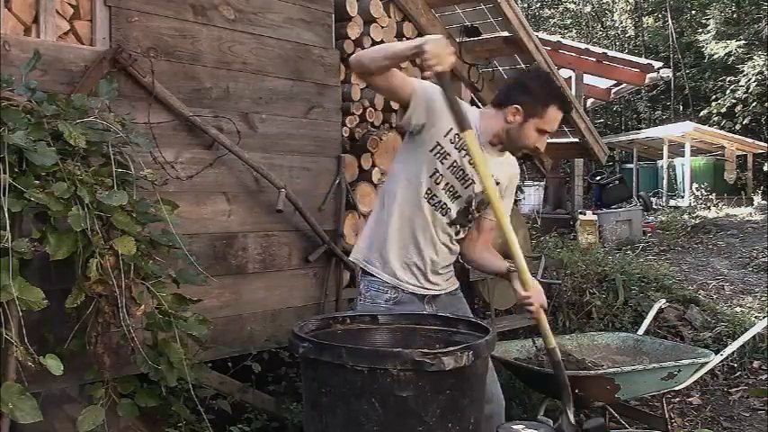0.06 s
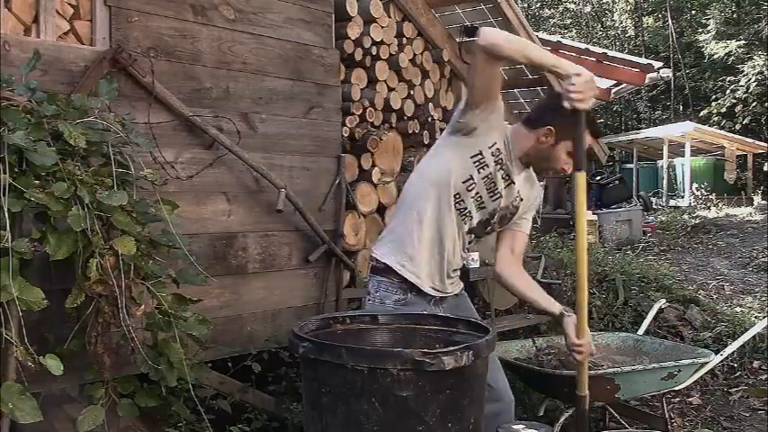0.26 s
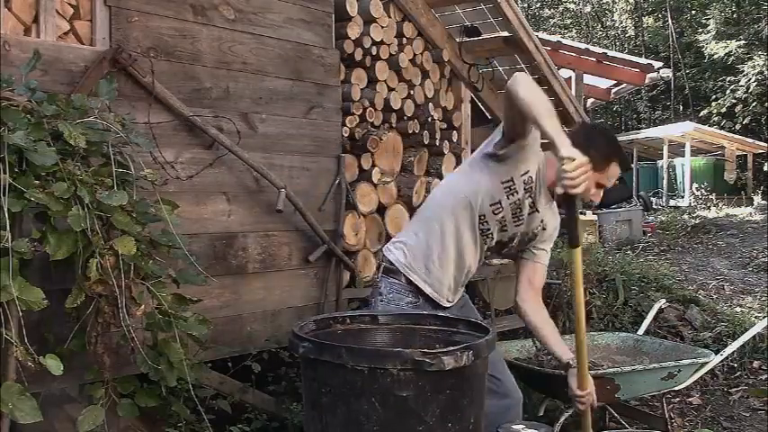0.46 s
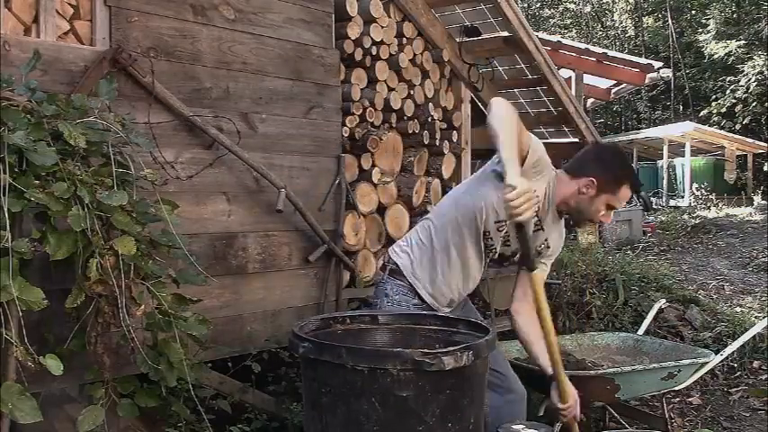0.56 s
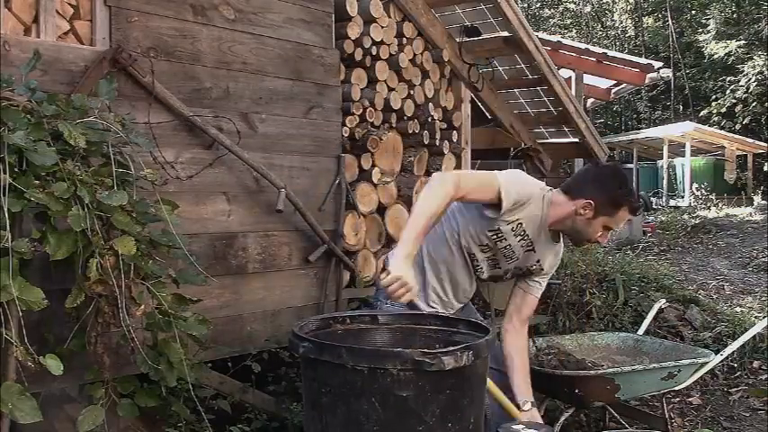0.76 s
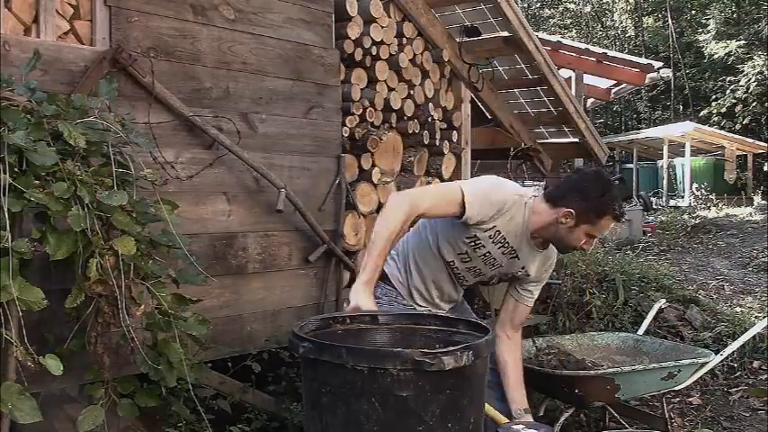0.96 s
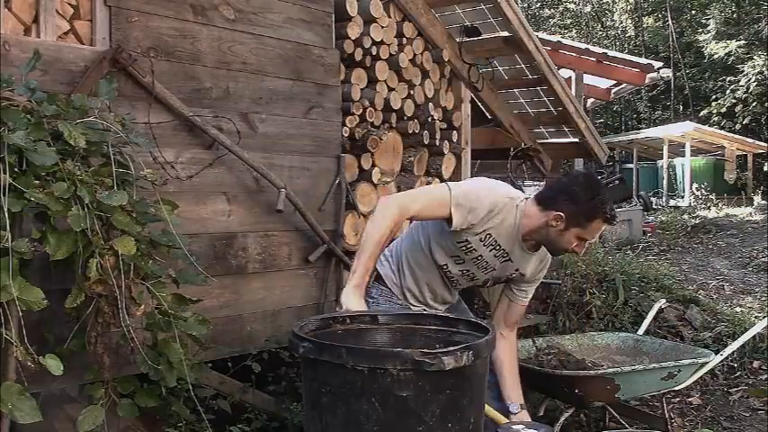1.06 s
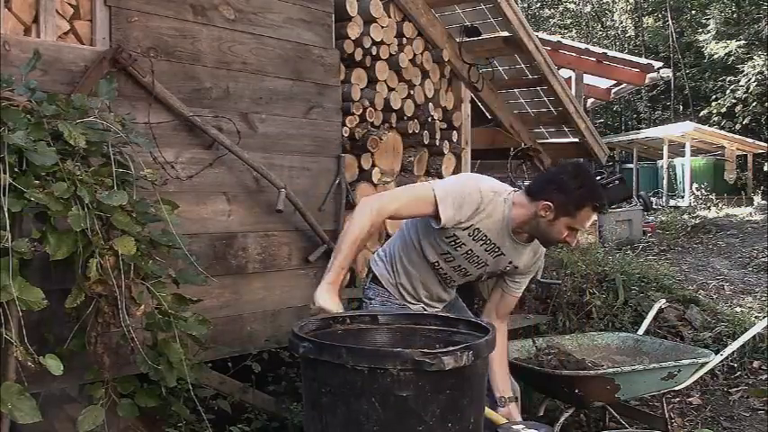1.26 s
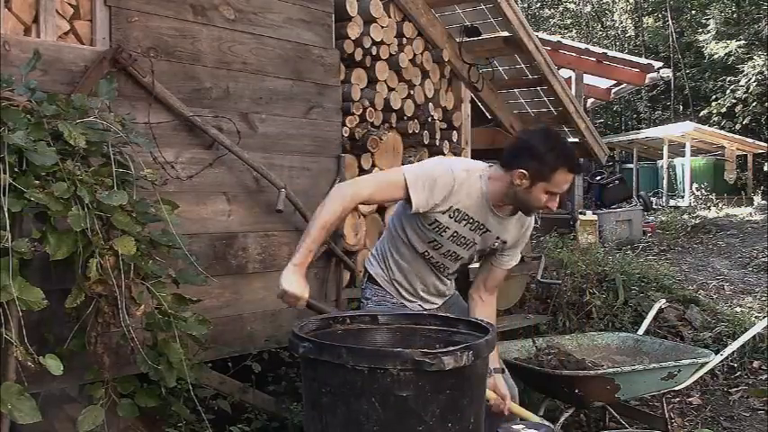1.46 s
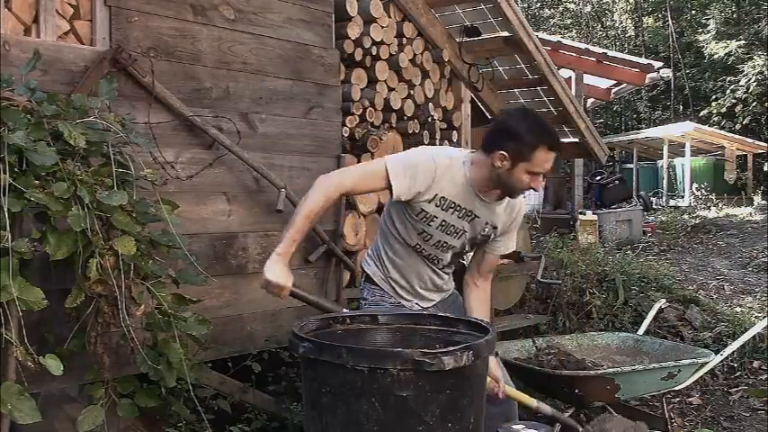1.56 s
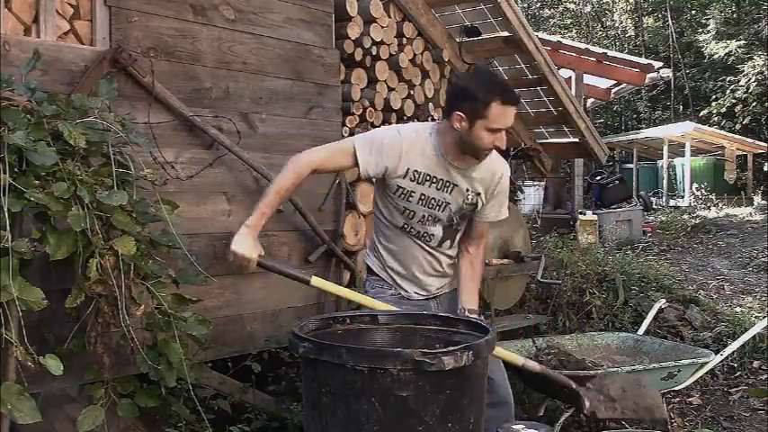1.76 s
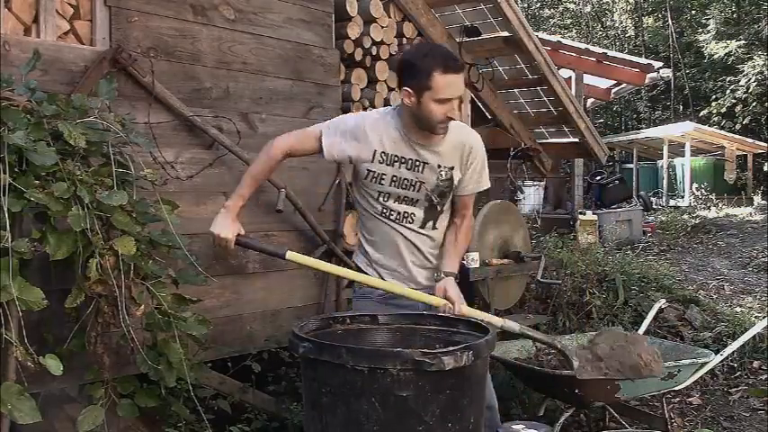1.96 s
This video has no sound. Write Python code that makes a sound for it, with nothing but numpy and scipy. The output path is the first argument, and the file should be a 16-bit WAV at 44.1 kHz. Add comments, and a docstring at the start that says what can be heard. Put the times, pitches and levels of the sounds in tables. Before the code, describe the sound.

Shovel blade bites into gritty, stony sand in quick metallic crunches, fading to faint yard ambience

```python
"""In a yard, a steel shovel is jabbed into gritty sand and dragged through it, a few metres from two microphones.
Grit crunches as trains of random wavelets whose level follows the drags, scuffs and jabs.
Dying sines make the blade ring, stones chink and, with crumbling noise, clods knock; noise bursts tick.
Short scattered echoes and shaped noise surround it. Resonant noise makes chirrs and a low squeak, and a thin
fuzzy sine whistles, perhaps a far bird."""
import sys
import numpy as np
from scipy import signal
from scipy.fft import rfft, irfft
from scipy.io import wavfile
from scipy.ndimage import uniform_filter1d

SR = 44100
rng = np.random.default_rng(int(sys.argv[2]) if len(sys.argv) > 2 else 0)


def transcribe(signal):
    """Save signal, clipped to [-1, 1], as a 16-bit WAV file at the path in sys.argv[1]."""
    frames = np.atleast_2d(signal).T
    limited = np.clip(frames, -1, 1)
    pcm = np.round(limited * 32767).astype(np.int16)
    wavfile.write(sys.argv[1], SR, pcm)


def ratio(d):
    """dB to gain"""
    e = np.asarray(d, float) / 20
    return 10 ** e


N = 88200  # samples


def evened(x):
    """Power normalisation: scales to rms 1."""
    return x / np.sqrt(np.mean(x ** 2) + 1e-20)


def read(points, hz):
    """Interpolation of a spectrum on a log-frequency axis."""
    f, value = np.transpose(points)
    return np.interp(np.log(hz + 1), np.log(f + 1), value)


def add(mix, s, sound):
    """Superposition: adds a sound to the mix at time s in seconds."""
    part = mix[..., round(s * SR):][..., :sound.shape[-1]]
    part += sound[..., :part.shape[-1]]


def resonate(x, hz, width_hz):
    """Resonance by heterodyning: shifts hz (fixed or moving) to zero, low-passes, shifts back; peak gain 1."""
    turn = np.exp(2j * np.pi * np.cumsum(hz * np.ones(len(x))) / SR)
    r = np.exp(-np.pi * width_hz / SR)
    lowered = x / turn + 1e-18
    return 2 * (turn * signal.lfilter([1 - r], [1, -r], lowered)).real


def ping(hz, t60, rise_s=0.0018):
    """Damped oscillation: a sine with exponential decay and a soft start."""
    t = np.arange(0, 0.3, 1 / SR)
    return ratio(-60 * t / t60) * (1 - np.exp(-t / rise_s)) * np.sin(2 * np.pi * hz * t)


# Spectrum of the outdoor air. Each row: frequency in Hz, relative spectral density in dB.
AIR_SPECTRUM = [(15, -42), (25, -48), (92, 2.5), (229, 0), (516, -6), (887, -5.5), (1560, -11.5),
                (2410, -12), (4250, -16), (7710, -20.5), (16000, -33.5)]
# Likeness of the two sides, up to 9 kHz. Each row: frequency in Hz, left-right correlation.
LIKENESS = [(30, 1), (100, 1), (240, 0.66), (950, 0.65), (3800, 0.74), (7000, 0.96), (9000, 0.93)]
AIR_DB, PATCH_DB = -57, 0.97  # rms level; rms size of the patches


def air():
    """Partly correlated coloured noise: an outdoor background whose time-frequency patches drift."""
    frames, hz = N // 256 + 5, np.fft.rfftfreq(1024, 1 / SR)
    a, b, c, d, patches = rng.standard_normal((frames, 513, 5)).T
    patches = uniform_filter1d(patches, 12, axis=0)
    patches = evened(uniform_filter1d(patches, 10, axis=1))
    same = np.clip(read(LIKENESS, hz) + (hz > 9000), -1, 1)[:, None]  # identical above 9 kHz
    left = a + 1j * b
    right = same * left + np.sqrt(1 - same ** 2) * (c + 1j * d)
    spectrum = np.array([left, right]) * ratio(read(AIR_SPECTRUM, hz)[:, None] + PATCH_DB * patches)
    noise = signal.istft(spectrum, nperseg=1024, noverlap=768)[1][:, :N]
    return ratio(AIR_DB) * evened(noise)


# Single grains ticking on steel. Each row: start in seconds, level in dB before a common 4 dB cut,
# pitch in Hz, body level in dB relative to the pitched part.
TICKS = [(0.0142, -40.5, 5830, -2.5), (0.0214, -42.5, 5800, -2.5), (0.201, -43.5, 6610, -10),
         (0.4018, -19, 7400, -4), (0.4141, -13.5, 5700, -23), (0.7312, -30.5, 6900, -16),
         (0.8255, -34, 4000, -12), (1.1384, -42, 5400, -17), (1.1494, -49, 5460, 0),
         (1.2126, -50, 7100, -3), (1.2494, -51, 6800, -8), (1.2694, -47, 5600, -10), (1.327, -53, 6600, 3),
         (1.5094, -59, 4210, 11), (1.5614, -66, 4190, -13), (1.5994, -60, 4010, 0), (1.6744, -55, 4020, 3)]
TICK_T60_S = 0.023


def ticks():
    """Resonant response to brief noise: each grain excites a high band and a lower body band."""
    out = np.zeros(N)
    t = np.arange(2000) / SR
    for (s, db, hz, body_db), puff in zip(TICKS, rng.standard_normal((len(TICKS), 2, 2000))):
        fade = ratio(db - 4 - 60 * t / TICK_T60_S)
        high = evened(resonate(puff[0], hz, 1300))
        body = ratio(body_db) * evened(resonate(puff[1], 1350, 1700))
        add(out, s, fade * (high + body))
    return out


YARD_T60_S, YARD_SIDE = 0.073, 0.067  # echo decay; share of left-right difference


def yard(x):
    """Sparse reverberation: short scatter of echoes from wall, barrel and ground, from 3 ms on."""
    t = np.arange(6000) / SR
    signs = np.sign(rng.standard_normal((2, 6000)))
    sparse = rng.random((2, 6000)) < 0.05
    middle, side = signs * sparse * (t > 0.003) * ratio(-60 * t / YARD_T60_S)
    side = uniform_filter1d(side, size=4) * 2  # the highest treble arrives alike on both sides
    tail = np.array([middle + YARD_SIDE * side, middle - YARD_SIDE * side])
    return signal.fftconvolve(x.mean(0)[None], tail / np.linalg.norm(middle), axes=1)[:, :N]


# Clods and stones knocking. Each row: start in seconds, nominal peak level in dB, pitch in Hz, t60 in seconds.
KNOCKS = [(0.051, -49, 900, 0.1), (0.383, -13, 1096, 0.028), (0.591, -15, 1730, 0.022),
          (0.626, -20.5, 1240, 0.033), (0.705, -22.5, 548, 0.037), (0.78, -12, 1586, 0.039),
          (0.847, -33.5, 363, 0.023), (1.004, -14, 321, 0.021), (1.022, -27, 343, 0.033),
          (1.504, -43.5, 1074, 0.054), (1.543, -61, 296, 0.028), (1.669, -48.5, 746, 0.052),
          (1.752, -36.5, 204, 0.036), (1.832, -43, 470, 0.045), (1.875, -27, 440, 0.049),
          (1.897, -27.5, 456, 0.058)]
KNOCK_ROUGH = 0.2  # gain of the crumbling noise


def knocks():
    """Damped impact: a low dying tone with crumbling noise an octave above."""
    out = np.zeros(N)
    t = np.arange(4000) / SR
    for (s, db, hz, t60), puff in zip(KNOCKS, rng.standard_normal((len(KNOCKS), 4000))):
        crumble = evened(resonate(puff, 2 * hz, 0.97 * hz)) * ratio(-60 * t / t60)
        add(out, s, ratio(db) * (ping(hz, t60, 0.0013)[:4000] + KNOCK_ROUGH * crumble))
    return out


# Narrow chirrs and, last, a low squeak. Each row: start in seconds, length in seconds, level in dB,
# pitch in Hz, width in Hz of each of two equal resonances.
CHIRRS_AND_SQUEAK = [(.09, .12, -68, 4200, 600), (1.1, .25, -71, 4000, 700), (1.42, .2, -67, 4200, 700),
                     (1.62, .2, -72, 4000, 700), (1.41, .09, -76, 7550, 150), (1.76, .075, -62, 1480, 80)]


def chirrs_and_squeak():
    """Narrow-band noise: one hiss passed twice through a resonance and gated."""
    out, t = np.zeros(N), np.arange(N) / SR
    hiss = rng.standard_normal(N)
    for start, length, db, hz, width_hz in CHIRRS_AND_SQUEAK:
        band = evened(resonate(resonate(hiss, hz, width_hz), hz, width_hz))
        gate = np.clip(np.minimum(t - start, start + length - t) / 0.01, 0, 1)
        out += band * ratio(db) * gate
    return out


# Colour of the grit. Each row: frequency in Hz, relative spectral density in dB.
GRIT = [(71, -48), (120, -6), (362, 0.5), (427, -5), (569, -4), (684, -8), (1090, -2.5), (1620, -3.5),
        (1940, -6), (2810, -10.5), (3900, -9.5), (4590, -8), (6770, -13.5), (10600, -20.5), (16000, -14)]


def grains(low_hz, high_hz, per_s, cycles, spread_db, count=20):
    """Shot noise: each pitch has its own random train of dying wavelets, a few of them large."""
    out = np.zeros(N)
    for hz in np.geomspace(low_hz, high_hz, count):
        size = ratio(spread_db * np.minimum(rng.exponential(1, N), 4)) * np.sign(rng.random(N) - 0.5)
        train = size * (rng.random(N) < per_s / count / SR)
        wavelet = ping(hz, 2 * cycles / hz, 0.5 / hz)[:2000]
        wavelet = wavelet / np.linalg.norm(wavelet)
        out += ratio(read(GRIT, hz)) * np.sqrt(hz) * signal.oaconvolve(train, wavelet)[:N]
    return evened(out)


# Drags and small scuffs of the blade through sand, in successive stretches of time.
# Each row: time in seconds, grit level in dB, clod level in dB relative to grit,
# fine sand level in dB relative to grit.
DRAGS_AND_SCUFFS = [
    [(0.27, -26.5, -6, -7.5), (0.316, -40, 0, 3), (0.372, -39.5, -21, 5.5), (0.376, -39.5, -17, 3)],
    [(0.392, -35.5, -5, -2), (0.414, -24.5, -21.5, -7.5), (0.426, -27.5, -13, -3.5), (0.47, -45, -6.5, 0.5),
     (0.506, -37, -8, -6), (0.538, -55, -8, -7.5), (0.553, -48.5, 1, -4)],
    [(0.565, -37, -7, -8), (0.583, -41.5, -7, -10), (0.591, -36, -13, -18), (0.599, -53, 7, -10),
     (0.603, -46.5, 10.5, -7)],
    [(0.63, -38, 9, -12), (0.65, -39.5, -0.5, -20), (0.692, -39, 1, 3), (0.712, -30.5, -6.5, -15.5),
     (0.744, -43.5, 9, 3.5), (0.756, -48.5, 8, -1), (0.772, -43, -2, -13), (0.776, -35.5, -13, -7)],
    [(0.8, -38.5, -2.5, -4.5), (0.864, -58, 8, -10), (0.93, -63, -22, -10)],
    [(0.935, -67, -7, -7), (0.967, -37, -14, -10), (0.985, -39, 1, 0), (0.997, -40, -3.5, -1.5),
     (1.009, -34, 8, -4), (1.047, -56, 7.5, -9), (1.13, -72, 3, -3)],
    [(1.135, -68, -2, -7), (1.149, -56, 2.5, -15), (1.179, -68.5, 6, 7.5), (1.187, -68, 5, -1),
     (1.271, -57.5, -15, -3.5), (1.301, -65.5, 0, -9), (1.347, -59, 6, -14), (1.36, -79, -24, -24)],
    [(1.36, -74, -23, -24), (1.474, -66, -2, -19), (1.488, -69.5, -3, -15), (1.554, -58, 7.5, -13),
     (1.648, -78, 0, -16), (1.678, -58.5, -8, -19), (1.692, -70, -11, -17), (1.8, -61, 4, -19)],
    [(1.8, -71, 8, -20), (1.812, -69, -6, -1), (1.84, -53, 11, -4.5), (1.86, -53.5, -0.5, 2),
     (1.898, -49, 8.5, -4.5), (1.942, -75, -4, 4), (1.964, -63.5, 8, -14), (2.0, -79, -10, -8)],
]
# Jabs of the blade edge. Each row: start in seconds, grit level in dB before the crest offset,
# clods in dB relative to grit, fine sand in dB relative to grit, t60 in seconds, rise in seconds,
# blade ring in dB relative to the grit level.
JABS = [(0.2489, -7.5, -8.5, -14.5, 0.13, .001, -6), (0.3803, -10, -9.5, 0, 0.04, 0.0025, -18),
        (0.5561, -26.5, 0, -16, 0.063, 0.0013, -30), (.604, -11.5, -7, 1.5, 0.12, 0.0065, -16),
        (.7792, -17, -2, 0.5, 0.063, 0.0022, -9)]
JAB_CREST_DB = -8  # crest offset, from tabled level to burst level


def pressure():
    """Envelope by power addition: drags and scuffs plus the sudden burst of each jab, for three registers."""
    t, level = np.arange(N) / SR, np.zeros((3, N))
    for stretch in DRAGS_AND_SCUFFS:
        s, db, clod_db, fine_db = np.transpose(stretch)
        on = (t >= s[0]) & (t < s[-1] + 0.004)
        level += on * ratio([np.interp(t, s, db + rel) for rel in (0, clod_db, fine_db)])
    power = uniform_filter1d(level, 60, axis=1) ** 2
    u = np.arange(0, 0.3, 1 / SR)
    for s, db, clod_db, fine_db, t60, rise_s, _ in JABS:
        burst = np.minimum(u / rise_s, 1) * ratio(db + JAB_CREST_DB - 60 * u / t60)
        add(power, s, (ratio([[0], [clod_db], [fine_db]]) * burst) ** 2)
    return np.sqrt(power)


# Grain registers: grit, clods, fine sand. Each row: lowest pitch in Hz, highest pitch in Hz,
# grains per second, cycles in which a wavelet decays by 30 dB, size spread in dB per unit exponential draw.
REGISTERS = [(786, 4590, 3000, 6.36, 2.5), (193.6, 800, 500, 3.4, 1.5), (5100, 10700, 13000, 6.2, 2)]
CLUMP_DB, CLUMP_S = 1.5, 0.003  # rms size and length of the clumps


def sand():
    """Amplitude modulation: pressure drives three grain registers, clumped across all pitches."""
    registers = np.array([grains(*row) for row in REGISTERS]) * pressure()
    clumps = uniform_filter1d(rng.standard_normal(N), round(CLUMP_S * SR))
    return (registers * ratio(CLUMP_DB * evened(clumps))).sum(0)


# Modes of the blade. Each row: frequency in Hz, relative level in dB, t60 in seconds before the cap.
BLADE = [(386.6, 4, 0.19), (563, -0.5, 0.17), (913, 7, 0.042), (1070, -2, 0.27), (1407, -2.5, 0.11),
         (1470, -2, 0.04), (1810, -22, 0.14), (2070, -20, 0.097), (2300, 4.5, 0.047), (2530, -1.5, 0.2),
         (2840, -10, 0.21), (3398, 3.5, 0.24), (3760, -18, 0.059), (5490, 8.5, 0.033), (6520, 1, 0.047),
         (7150, 7.5, 0.036)]
LONGEST_RING_S = 0.1  # cap on t60


def blade():
    """Modal synthesis: each jab excites the blade's modes with random sign and strength."""
    out = np.zeros(N)
    modes = np.array([ratio(db) * ping(hz, min(t60, LONGEST_RING_S), 0.00014) for hz, db, t60 in BLADE])
    places = rng.uniform(-1.4, 1, (len(JABS), len(BLADE)))
    for (s, db, *_, ring_db), where in zip(JABS, places):
        weights = np.sign(where) * ratio(1.96 * where)
        add(out, s, ratio(db + ring_db) * weights @ modes / 4)
    return out


# Stones chinking on steel. Each row: start in seconds, nominal peak level in dB, pitch in Hz, t60 in seconds.
CHINKS = [(.2515, -7.5, 3164, 0.016), (.294, -32, 5560, .05), (.3805, -12, 5780, .025),
          (.3805, -8, 7150, 0.011), (.3805, -16, 2300, .02), (.611, -20, 3890, 0.066),
          (.781, -13.5, 5100, 0.017), (.784, -15.5, 4017, 0.029), (1.006, -31.5, 4030, 0.052)]


def chinks():
    """Single-mode impact: each row gives one short dying tone."""
    out = np.zeros(N)
    for s, db, hz, t60 in CHINKS:
        add(out, s, ratio(db) * ping(hz, t60, 0.0012))
    return out


# Falling whistle. Each row: time in seconds, pitch in Hz, level of the sine in dB.
WHISTLE = [(1.205, 2670, -62), (1.24, 2700, -60), (1.3, 2660, -60), (1.42, 2560, -61), (1.5, 2400, -65),
           (1.68, 2370, -70)]


def whistle():
    """Frequency modulation: a gliding sine made fuzzy by noise in a resonance at the same pitch."""
    t, (s, hz, db) = np.arange(N) / SR, np.transpose(WHISTLE)
    gate = np.clip(np.minimum(t - s[0], s[-1] - t) / 0.012, 0, 1)
    pitch = np.interp(t, s, hz)
    tone = np.sin(2 * np.pi * np.cumsum(pitch) / SR)
    fuzz = evened(resonate(rng.standard_normal(N), pitch, 120))
    return (tone + 0.56 * fuzz) * ratio(np.interp(t, s, db)) * gate


# Balance of the microphones. Each row: frequency in Hz, left minus right in dB.
BALANCE = [(60, -3), (250, -.4), (600, -1.3), (1200, -0.8), (2400, -1), (5000, -1.9), (8000, -2.5),
           (10000, 2)]
LOW_CUT_HZ, DIP_HZ, DIP_WIDTH_HZ, DIP_DB = 188.4, 4780, 870, -4


def microphones(x):
    """Linear filtering: the shovel is heard with little bass, a treble dip and slightly unequal sides."""
    hz = np.fft.rfftfreq(N, 1 / SR)
    half = ratio(0.5 * read(BALANCE, hz))
    dip = ratio(DIP_DB * np.exp(-((hz - DIP_HZ) / DIP_WIDTH_HZ) ** 2))
    x = signal.sosfilt(signal.butter(5, LOW_CUT_HZ, "high", fs=SR, output="sos"), x)
    return irfft(rfft(x) * dip * np.array([half, 1 / half]), N)


YARD_DB = -7.5  # gain of the echoes


def scene():
    """Superposition of shovel, echoes, background, chirrs, squeak and whistle."""
    near = microphones(ticks() + knocks() + sand() + blade() + chinks())
    return air() + near + ratio(YARD_DB) * yard(near) + chirrs_and_squeak() + whistle()


def low_pass(x):
    """Removes everything above the highest recorded frequency."""
    return signal.sosfilt(signal.butter(12, 16290, fs=SR, output="sos"), x)


def record(dry):
    """Band limitation: a linear-phase low-pass at 16 kHz finishes the mix."""
    taps = signal.firwin(511, 16000, window=("kaiser", 9), fs=SR)
    finished = signal.oaconvolve(dry, taps[None], "same")
    return low_pass(finished)


dry = scene()
out = record(dry)
transcribe(out)
```